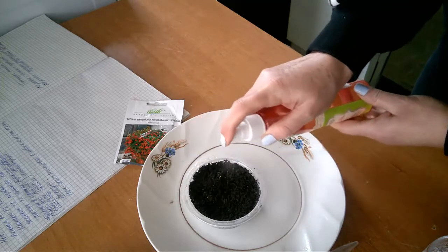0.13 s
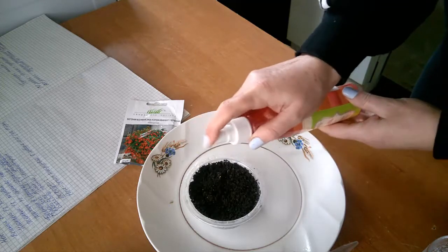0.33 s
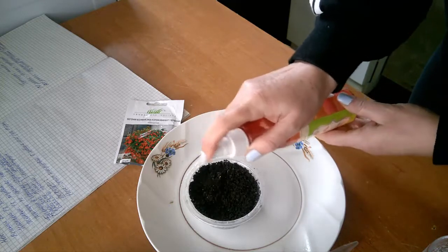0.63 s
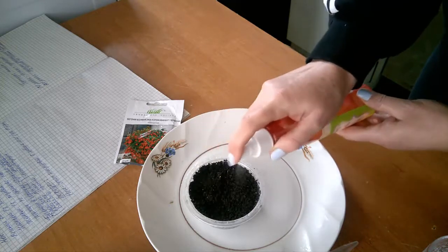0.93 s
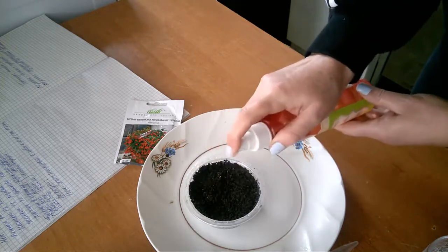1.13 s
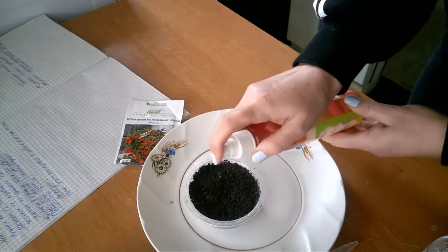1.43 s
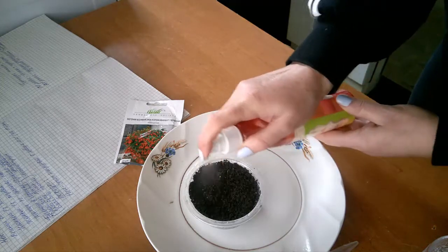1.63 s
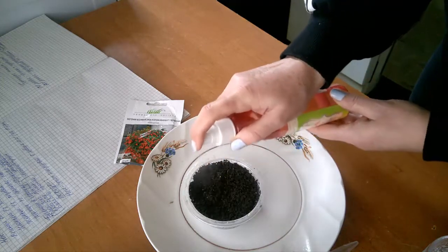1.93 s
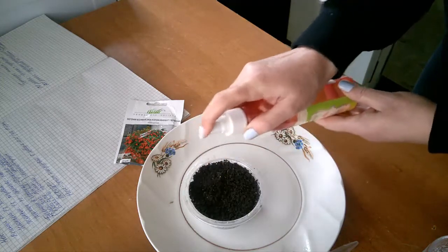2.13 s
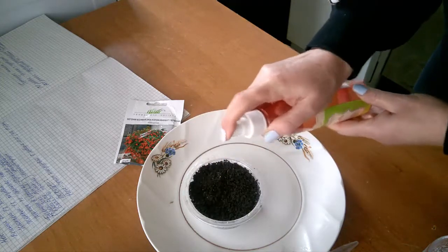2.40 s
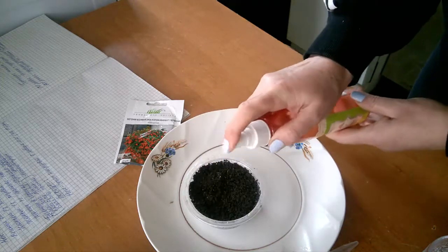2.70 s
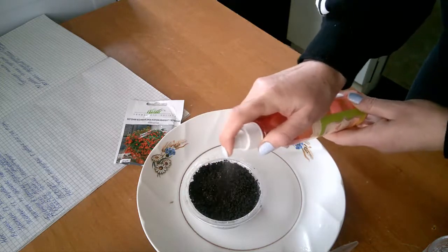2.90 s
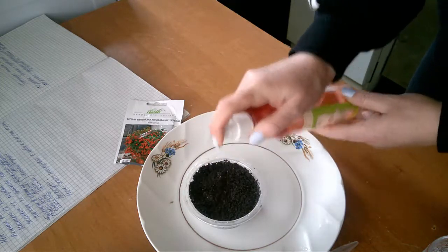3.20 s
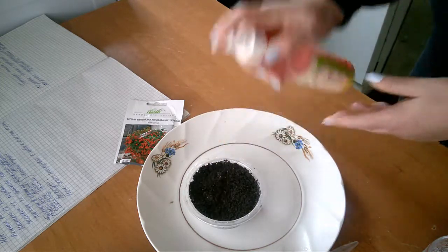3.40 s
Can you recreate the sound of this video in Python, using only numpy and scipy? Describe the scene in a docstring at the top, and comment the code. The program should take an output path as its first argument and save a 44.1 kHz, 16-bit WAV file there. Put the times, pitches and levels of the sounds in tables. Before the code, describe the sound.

A small spray bottle is pumped about a dozen times in a quick, steady rhythm. Each press gives a light snap, a soft hollow thunk and a short hiss of mist, close to the microphone in a quiet room.

```python
"""A small finger-pump spray bottle, pressed in a quick rhythm close to the microphone in a quiet room.
Each stroke opens the valve with a snap and a sputter that rings the pump head, and the hollow bottle
thunks. The mist swells to a bright hiss, holds and dies into the room. After the early strokes
the piston springs back with a faint knock. Behind it all lie room tone and a faint motor hum."""
import sys
import numpy as np
from scipy import signal
from scipy.fft import rfft, irfft, next_fast_len
from scipy.io import wavfile
from scipy.ndimage import uniform_filter1d, map_coordinates

SR = 44100
rng = np.random.default_rng(int(sys.argv[2]) if len(sys.argv) > 2 else 0)


def store_pcm(level_fs):
    """Save levels as 16-bit WAV."""
    pcm = np.round(np.clip(level_fs, -1, 1) * 32767).astype(np.int16)
    wavfile.write(sys.argv[1], SR, np.atleast_2d(pcm).T)


N = 156555
LEAD = SR // 2  # run-in, so we come in on a stroke already dying away
T = (np.arange(N + LEAD) - LEAD) / SR

# Presses of the pump. Each row: valve opening in seconds, sputter level in dB, sputter t60 in seconds,
# bottle level in dB, mist lag, swell and hold in seconds, mist level in dB, throat gain on it in dB.
STROKES = [(-.17, -40, .15, -44, 0.00092, 0.071, 0.042, -38.5, -9),
           (0.0975, -42, 0.35, -48.5, 0.0048, 0.08, 0.035, -38, -5.5),
           (0.376, -41.5, 0.6, -46, 0.0067, 0.073, 0.032, -37.5, -7),
           (.640, -41.5, 0.3, -50.5, 0.0023, 0.084, 0.016, -38.5, -4.5),
           (0.91, -43, 0.5, -49, 0.0099, 0.066, 0.034, -37.5, -17),
           (1.233, -48.5, 0.056, -53, 0.013, 0.068, 0.06, -36.5, -6.5),
           (1.548, -44.5, 0.17, -51, 0.012, 0.077, 0.045, -36.5, -13.5),
           (1.857, -41.5, 0.28, -50, 0.0063, 0.075, 0.043, -36, -8),
           (2.154, -41.5, 0.19, -48.5, 0.0036, 0.069, 0.036, -37.5, 0),
           (2.433, -42, 0.27, -48, 0.0065, 0.081, 0.013, -38.5, -1),
           (2.746, -46, 0.084, -56, 0.014, 0.075, 0.054, -37.5, -3.5),
           (3.057, -43.5, 0.36, -50.5, 0.002, 0.075, 0.032, -38.5, -12)]
# Resonances of the pump head. Each row: centre in Hz, width in Hz, relative level in dB.
HEAD_MODES = [(1270, 83, -3.5), (2140, 184, 0.5), (2750, 360, -4), (3370, 630, -5.5), (5180, 1200, 0),
              (5400, 380, 5), (5880, 370, -2), (6650, 1450, -9), (9400, 2800, -21)]
# Resonances of the hollow bottle. Each row: centre in Hz, width in Hz, relative level in dB.
BOTTLE_MODES = [(318, 120, -3), (438, 104, 5.5), (547, 84, 1), (607, 75, -3.5)]
# Broad colour of the mist. Each row: frequency in Hz, relative spectral density in dB.
MIST_SPECTRUM = [(150, -40.5), (250, -9), (342, -21), (414, -11.5), (651, -14), (1380, -9), (1550, -9.5),
                 (2360, 1.5), (3710, -0.5), (4570, 1), (6140, 1.5), (7570, -6.5), (12500, -13.5),
                 (14900, -15.5), (16000, -38.5)]
# Peaks and a dip the nozzle puts in the hiss. Each row: centre in Hz, width in Hz, gain in dB.
NOZZLE_BANDS = [(2410, 360, -3.5), (4580, 130, 4), (6700, 2100, 0.5), (8430, 1250, 3.5)]
# Knocks of the returning piston. Each row: start in seconds, level in dB.
PISTON_RETURNS = [(.3, -56), (.575, -55), (.82, -63), (1.095, -56)]
# How long the room rings. Each row: frequency in Hz, t60 in seconds.
ROOM_DECAY = [(300, 0.64), (2000, 0.21), (6000, 0.33), (8000, 0.2), (15000, 0.13)]
# Colour of the room tone. Each row: frequency in Hz, relative spectral density in dB.
ROOM_TONE_SPECTRUM = [(20, -7), (30, -7), (60, -8.5), (120, -16.5), (200, -20), (310, -22), (840, -27),
                      (1300, -31), (2500, -34), (4000, -34), (6400, -35.5), (7300, -48), (10000, -45.5),
                      (16000, -48.5)]
# Tones of the motor and the mains. Each row: frequency in Hz, rms level in dB, level waver in dB.
HUM_TONES = [(47.9, -59.5, 4.5), (45.3, -63, 2.5), (97.4, -67, -1), (99.9, -69.5, 3), (145.8, -68, 0.8)]


def amp(db):
    """dB to gain."""
    return 10 ** (np.asarray(db) / 20)


def unit(x):
    """Scaled to rms 1."""
    return x / np.sqrt(np.mean(x ** 2) + 1e-20)


def along(points, hz):
    """Read a curve of (Hz, value) points on a log frequency axis."""
    f, v = np.transpose(points)
    return np.interp(np.log(hz + 1), np.log(f + 1), v)


def filtered(x, response):
    """x through a complex frequency response."""
    size = next_fast_len(len(x) + SR // 2)
    return irfft(rfft(x, size) * response(np.fft.rfftfreq(size, 1 / SR)), size)[:len(x)]


def resonances(modes):
    """Causal response of (Hz, width, dB) resonances, alternating in sign."""
    return lambda f: sum((-1) ** k * amp(db) * 1j * f * width / (hz * hz - f * f + 1j * f * width)
                         for k, (hz, width, db) in enumerate(modes))


def wobble(rate):
    """A smooth random curve, rate knots a second."""
    knots = rng.standard_normal(int(len(T) * rate / SR) + 4)
    return map_coordinates(knots, [np.arange(len(T)) * rate / SR])


def fade(since, t60):
    """Silent before zero, then a decay."""
    return (since >= 0) * amp(-60 * np.clip(since, 0, None) / t60)


def patchy(x, depth_db):
    """Shift the colour in random patches of frequency and time."""
    spectrum = signal.stft(x, nperseg=512)[2]
    patches = uniform_filter1d(rng.standard_normal(spectrum.shape), size=5, axis=0)
    patches = uniform_filter1d(patches, size=16, axis=1)
    return signal.istft(spectrum * amp(depth_db * unit(patches)), nperseg=512)[1][:len(x)]


def bubbles(typical_per_s=280, t60=0.006, flare_db=9):
    """Air bubbles pop through the valve, so its hiss flares in short, uneven bursts."""
    count = np.cumsum(typical_per_s * amp(2.5 * wobble(150)) / SR)
    pops = np.append(0, np.diff(np.floor(count))) * amp(4.0 * rng.standard_normal(len(T)))
    flare = signal.fftconvolve(pops, fade(np.arange(SR // 50) / SR, t60))[:len(T)]
    return unit(rng.standard_normal(len(T)) * (1 + amp(flare_db) * flare))


def valve(snap_drive_db=14, snap_direct_db=1):
    """The valve snaps open; air and water sputter through it and ring the pump head."""
    envelope = sum(amp(db) * fade(T - start, t60) for start, db, t60, *_ in STROKES)
    snaps = sum(amp(db) * (np.arange(len(T)) == LEAD + round(start * SR)) for start, db, *_ in STROKES)
    sputter = bubbles()
    head = resonances(HEAD_MODES)
    drive = envelope * sputter + amp(snap_drive_db) * snaps
    ring = filtered(drive, head) / np.std(filtered(sputter, head))
    return ring + amp(snap_direct_db) * snaps


def bottle_thunk(start, db, hold, t60, rise_s=0.002, low_cut_hz=260):
    """The hollow bottle answers a soft push with a burst of noise in its resonances."""
    t = np.arange(SR // 3) / SR
    envelope = (1 - np.exp(-t / rise_s)) * fade(np.clip(t - hold, 0, None), t60)
    push = envelope * rng.standard_normal(len(t))
    ring = filtered(push, lambda f: resonances(BOTTLE_MODES)(f) * 1j * f / (low_cut_hz + 1j * f))
    ring *= amp(db) * np.linalg.norm(envelope) / np.linalg.norm(ring)
    track = np.zeros(len(T) + len(t))
    track[LEAD + round(start * SR):][:len(t)] = ring
    return track[:len(T)]


def mist_colour(f):
    """The gain of the hiss at each frequency, shaped by the nozzle."""
    nozzle_db = sum(db / (1 + (2 * (f - hz) / width) ** 2) for hz, width, db in NOZZLE_BANDS)
    return amp(along(MIST_SPECTRUM, f) + nozzle_db)


def mist(sag_db=1.5, release_t60=0.28, treble_hz=6400, throat_hz=2440, throat_width_hz=267):
    """Pressure at the nozzle swells, sags through a hold and lets go; more is louder and brighter."""
    low_gain = treble_gain = throat_gain = 0
    for start, _, _, _, lag, swell, hold, db, throat_db in STROKES:
        since = T - start - lag
        rise = np.sin(np.pi / 2 * np.clip(since / swell, 0, 1)) ** 1.23
        sag = amp(-sag_db * np.clip((since - swell) / hold, 0, 1))
        release = fade(np.clip(since - swell - hold, 0, None), release_t60)
        pressure = rise * sag * release
        low_gain += amp(db) * pressure
        treble_gain += amp(db) * pressure ** 1.33
        throat_gain += amp(db + throat_db) * pressure
    noise = patchy(rng.standard_normal(len(T)), depth_db=1.86)
    hiss = unit(filtered(noise, mist_colour)) * amp(0.93 * wobble(44.58))  # the level flutters
    treble = filtered(hiss, lambda f: 1 / (1 + (treble_hz / (f + 1)) ** 8))
    throat = filtered(hiss, resonances([(throat_hz, throat_width_hz, 0)]))  # low nozzle resonance
    return low_gain * (hiss - treble) + treble_gain * treble + throat_gain * throat


def piston_knocks():
    """The piston springs back and knocks faintly through the bottle."""
    return sum(bottle_thunk(start, db, hold=0, t60=0.08) for start, db in PISTON_RETURNS)


def room_reverb(x):
    """The room answers just after the direct sound, each frequency dying at its own speed."""
    hz, t, spectrum = signal.stft(rng.standard_normal(SR // 2), SR, nperseg=256)
    decay = amp(-60 * t / along(ROOM_DECAY, hz)[:, None])
    tail = signal.istft(spectrum * decay, SR, nperseg=256)[1]
    return signal.fftconvolve(np.pad(x, (200, 0)), tail / np.linalg.norm(tail))[:len(x)]


def room_tone(db=-58.5):
    """The steady air of a quiet room, mostly low rumble."""
    noise = rng.standard_normal(len(T))
    return amp(db) * unit(filtered(noise, lambda f: amp(along(ROOM_TONE_SPECTRUM, f)) * (f > 20)))


def motor_hum(drift_rad=0.11):
    """Slightly unsteady tones of a motor and the mains beat against each other."""
    hum = 0
    for hz, db, waver_db in HUM_TONES:
        peak = np.sqrt(2) * amp(db + waver_db * wobble(6.5))
        phase = 2 * np.pi * hz * T + drift_rad * wobble(3.69) + rng.uniform(0, 2 * np.pi)
        hum += peak * np.sin(phase)
    return hum


def scene(reverb_db=-8.5):
    """The bottle up close in mono, with the room and its hum well behind."""
    spray = valve()
    spray += sum(bottle_thunk(start, db, hold=0.02, t60=0.091) for start, _, _, db, *_ in STROKES)
    spray += mist() + piston_knocks()
    mix = spray + amp(reverb_db) * room_reverb(spray) + room_tone() + motor_hum()
    return mix[None, LEAD:]


def record(dry, top_hz=15700):
    """One microphone channel, with nothing kept above the band limit."""
    return filtered(dry[0], lambda hz: hz < top_hz)[None]


dry = scene()
out = record(dry)
store_pcm(out)
```